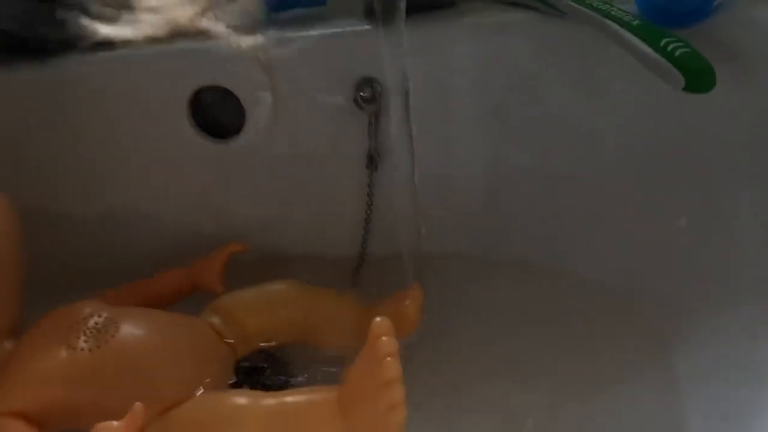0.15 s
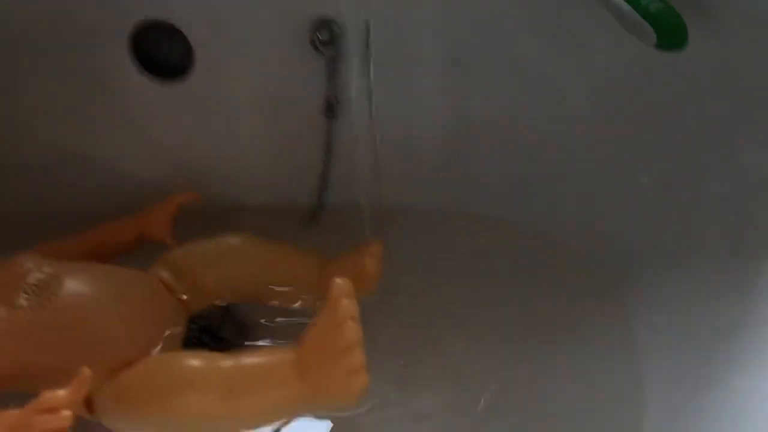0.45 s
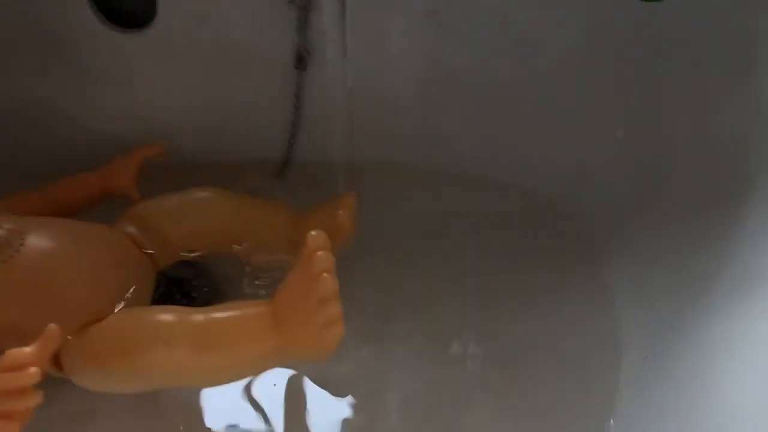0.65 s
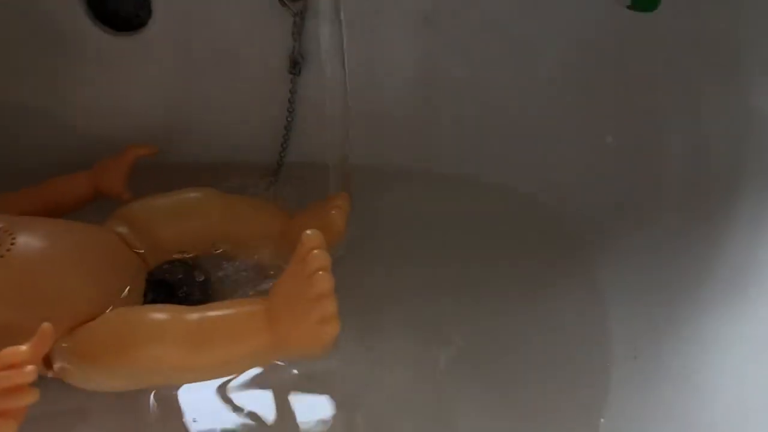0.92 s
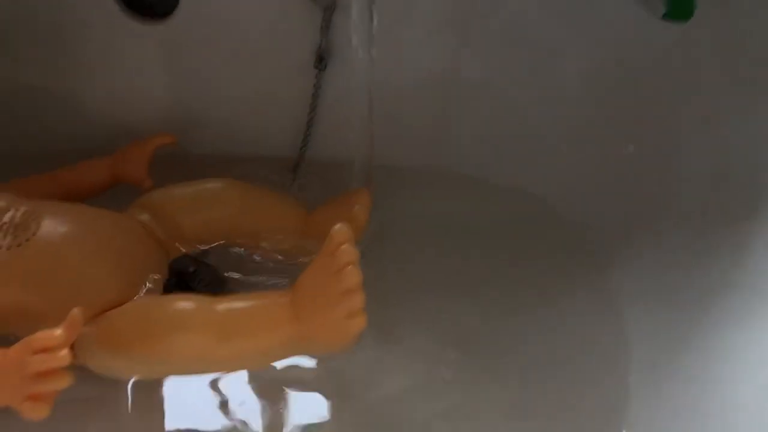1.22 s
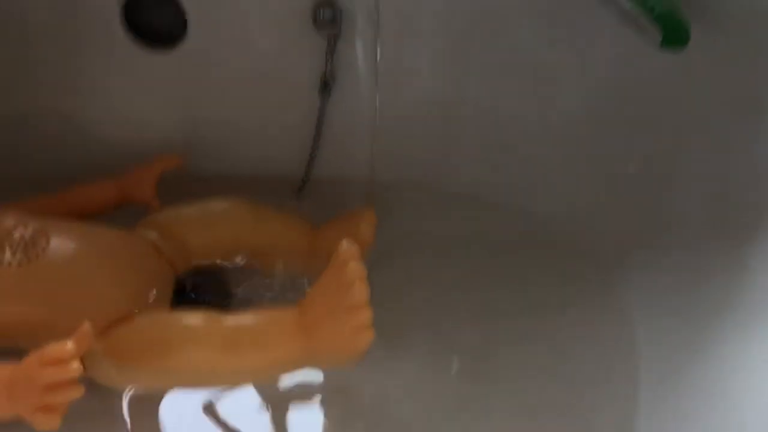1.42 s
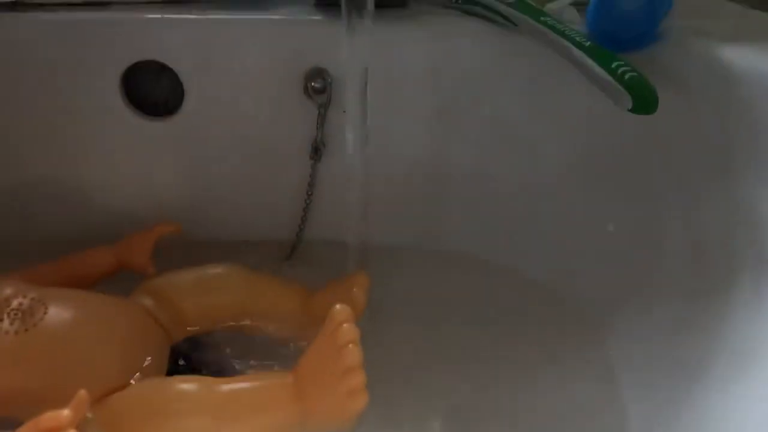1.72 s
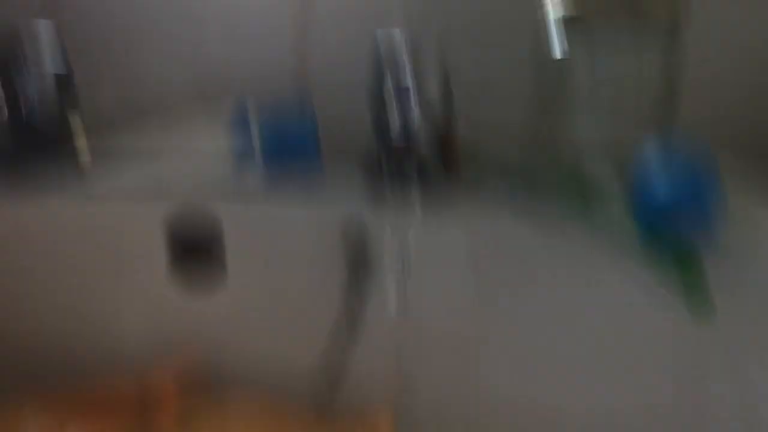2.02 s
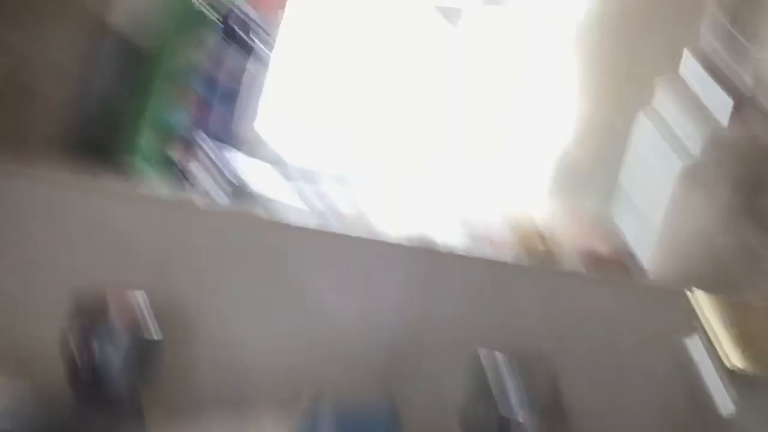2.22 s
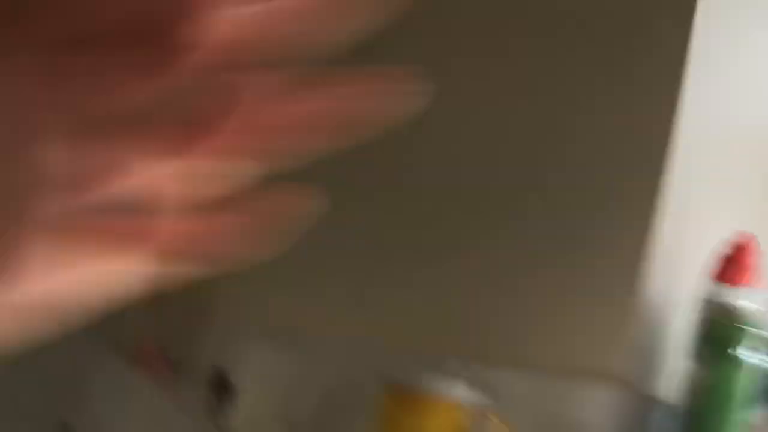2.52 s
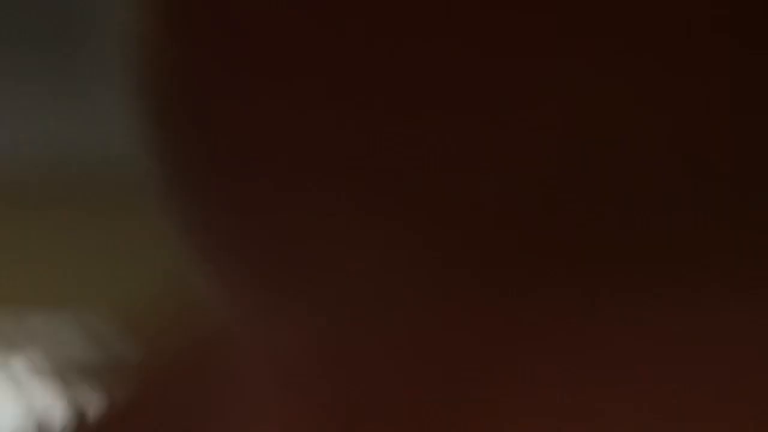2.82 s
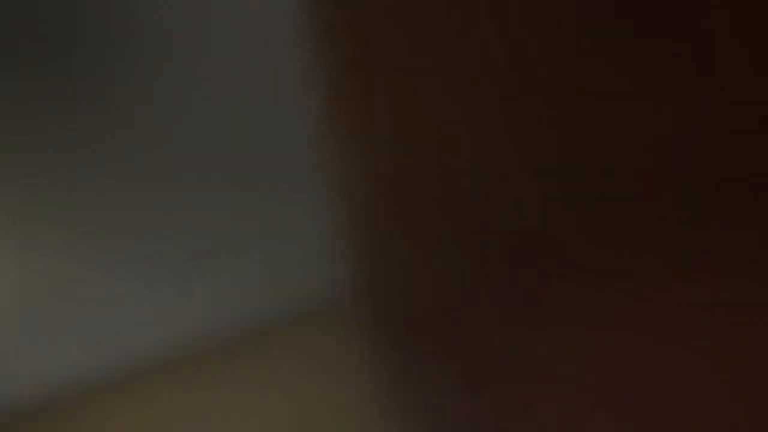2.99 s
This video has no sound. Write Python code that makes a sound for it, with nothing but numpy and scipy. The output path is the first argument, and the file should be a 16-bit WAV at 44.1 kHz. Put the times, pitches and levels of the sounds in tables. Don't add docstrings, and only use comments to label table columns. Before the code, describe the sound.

Thin tap water trickles and babbles into a bath while a hand-held phone is tapped and bumped.

```python
import sys
import numpy as np
from scipy import signal
from scipy.fft import rfft, irfft
from scipy.io import wavfile
from scipy.ndimage import uniform_filter1d

SR = 44100
rng = np.random.default_rng(int(sys.argv[2]) if len(sys.argv) > 2 else 0)


def attenuation_scalar(level_db):
    decades = np.asarray(level_db, float) / 20
    return 10 ** decades


def transcribe(signal):
    frames = np.atleast_2d(signal).T
    limited = np.clip(frames, -1, 1)
    pcm = np.round(limited * 32767).astype(np.int16)
    wavfile.write(sys.argv[1], SR, pcm)


N = 138915

# t/s, wash level/dB, spray level/dB
STREAM = [
    (0.0, -52, -53),
    (.6, -53, -55.5),
    (1.05, -50.5, -56),
    (1.25, -51, -45.5),
    (1.45, -55, -56.5),
    (1.65, -52, -56.5),
    (2.1, -52.5, -54),
    (2.4, -50.5, -59),
    (3.15, -58.5, -59),
]
RISE = 0.013


def evened(x):
    return x / np.sqrt(np.mean(x ** 2) + 1e-20)


def read(points, hz):
    f, value = np.transpose(points)
    return np.interp(np.log(hz + 1), np.log(f + 1), value)


def along(table, axis):
    rows = np.array(table)
    return np.interp(np.arange(N) / SR, rows[:, 0], rows[:, axis])


def add(mix, s, sound):
    part = mix[max(round(s * SR), 0):][:len(sound)]
    part += sound[:len(part)]


def hiss(colour, patchy_db, flicker_db, size, count=9):
    hop = size // 4
    frames, hz = N // hop + 5, np.fft.rfftfreq(size, 1 / SR)
    a, b, patches = rng.standard_normal((frames, len(hz), 3)).T
    patches = uniform_filter1d(patches, size=3, axis=0)
    patches = evened(uniform_filter1d(patches, size=count, axis=1))
    flicker = evened(uniform_filter1d(rng.standard_normal(frames), size=4))
    level_db = read(colour, hz)[:, None] + patchy_db * patches + flicker_db * flicker
    z = (a + 1j * b) * attenuation_scalar(level_db)
    return evened(signal.istft(z, nperseg=size, noverlap=size - hop)[1][:N])


def band(hz, width):
    f = np.fft.rfftfreq(N, 1 / SR)
    gain = np.exp(-((f - hz) / width) ** 2)
    return evened(irfft(rfft(rng.standard_normal(N)) * gain, N))


def bubble(hz, cycles, rise):
    u = np.arange(0, 2, hz / SR / cycles)
    swell = (u / 0.27 * np.exp(1 - u / 0.31)) ** 2
    return np.sin(2 * np.pi * cycles * u * (1 + rise * u)) * swell


def random_clicks(per_s, spread_db, limit):
    return attenuation_scalar(spread_db * np.minimum(rng.exponential(1, N), limit)) * (rng.random(N) < per_s / SR)


def wash():
    # f/Hz, density/dB
    wash_colour = [(88, -64), (150, 3), (578, -3.5), (854, -8.5), (998, -5), (1720, -5.5), (2810, -9),
                   (5680, -11), (10000, -25.5), (16000, -21)]
    return attenuation_scalar(along(STREAM, axis=1) - 2.0) * hiss(wash_colour, patchy_db=4.0, flicker_db=3.35, size=1024, count=14)


def spray():
    # f/Hz, density/dB
    spray_colour = [(530, -40), (900, -10), (1020, -88), (1660, -28.5), (2600, 18), (4980, 17.5),
                    (6330, 14.5), (16000, -9)]
    size = random_clicks(per_s=900, spread_db=11, limit=2.6)
    kind, out = rng.integers(0, 30, N), np.zeros(N)
    for k, hz in enumerate(np.geomspace(1000, 15500, 30)):
        grain = bubble(hz, 9.3 + 1.4 * rng.random(), 0.032) * attenuation_scalar(read(spray_colour, hz)) * hz ** 1.46
        out += signal.oaconvolve(size * (kind == k), grain)[:N]
    return evened(out)


def ticks():
    ticks_per_s, ticks_db = 300, -6
    out = np.zeros(N)
    for hz in np.geomspace(6000, 15500, 8):
        clicks = random_clicks(ticks_per_s / 8, spread_db=4, limit=2.5)
        out += signal.oaconvolve(clicks, bubble(hz, 5, .05))[:N]
    return attenuation_scalar(ticks_db) * evened(out)


def gurgle():
    centre_hz, width_hz, level_db, end_s = 4100, 1900, -57.5, .3
    t, out = np.arange(N) / SR, np.zeros(N)
    for place in (-.25, -.15, -.05, .1, .35, .65):
        clicks = random_clicks(per_s=40, spread_db=6.1, limit=2)
        out += signal.oaconvolve(clicks, bubble(centre_hz + width_hz * place, 10, .04))[:N]
    return attenuation_scalar(level_db) * evened(out) * np.clip((end_s - t) / 0.013, 0, 1)


def sway():
    sway_hz, sway_db = 63.9, -1.5
    turns = np.cumsum(sway_hz * (1 + 0.1011 * band(0, 7.49))) / SR
    return attenuation_scalar(sway_db + 1.0 * band(0, 24)) * np.sin(2 * np.pi * turns)


def tremor():
    # t/s, level/dB
    tremor_level = [(0, -49.5), (.2, -54), (.36, -43.5), (.5, -64), (.95, -56.5), (1.25, -47), (1.5, -57.5),
                    (1.78, -46), (1.85, -56.5), (1.92, -35), (1.96, -56), (2.02, -39.5), (2.24, -55),
                    (2.33, -47), (2.55, -48), (2.62, -48), (2.8, -46.5), (3.15, -52)]
    # f/Hz, density/dB
    rumble_colour = [(18, -45), (30, -32), (46, -1), (65, 8), (97, 0), (204, -13), (238, -23), (400, -39.5),
                     (520, -57), (880, -120)]
    rumble = hiss(rumble_colour, patchy_db=3.5, flicker_db=0.5, size=2048) + sway()
    mic_low_cut = signal.butter(5, 55, "high", fs=SR, output="sos")
    return signal.sosfilt(mic_low_cut, attenuation_scalar(along(tremor_level, axis=1) + 0.5) * rumble)


def whistle():
    return attenuation_scalar(-81) * band(10550, 80)


def knock(peak_db, hard, shallow, late, echo_db):
    late_s, late_power = 0.01214, 1.526
    knee_hz, case_low_hz, slope_db = 157.4, 36.8, -3
    body_hz, body_width_hz, body_db = 83.5, 59, 8.5
    shell_hz, shell_width_hz, shell_db = 151, 47, -5
    hollow_hz, hollow_width_hz, hollow = 774, 134, 0.23
    echo_s = 0.00396
    hz = np.fft.rfftfreq(8192, 1 / SR) + 1
    delay_s = 0.001293 + late * late_s * (100 / np.maximum(hz, 55)) ** late_power
    low = (hz / (case_low_hz * 2 ** shallow)) ** 7
    gain = low / (1 + low) * attenuation_scalar(slope_db * np.log2(1 + hz / knee_hz))
    gain = gain * np.exp(-(hz / (100 * 2 ** hard)) ** 1.326)
    body = 1 + attenuation_scalar(body_db) / (1 + 2j * (hz - body_hz) / body_width_hz)
    body = body + attenuation_scalar(shell_db) / (1 + 2j * (hz - shell_hz) / shell_width_hz)
    body = body * (1 - hollow / (1 + 2j * (hz - hollow_hz) / hollow_width_hz))
    when, sign = rng.random((3, 1)), rng.choice([-1, 1], (3, 1))
    echoes = 1 + attenuation_scalar(echo_db) * (sign * np.exp(-2j * np.pi * hz * echo_s * when)).sum(0)
    spread = np.exp(-2j * np.pi * np.cumsum(delay_s) * SR / 8192)
    x = irfft(gain * body * echoes * spread)[:6000]
    return attenuation_scalar(peak_db) * x / abs(x).max()


def skin():
    # f/Hz, density/dB
    skin_colour = [(88, -70), (150, 0.5), (324, -31), (355, -11), (1150, -17.5), (1310, -20), (1780, -18.5),
                   (2140, -15.5), (12000, -34.5), (15600, -86), (22000, -120)]
    return hiss(skin_colour, patchy_db=1.5, flicker_db=1.5, size=256)


def bumps(friction):
    # t/s, peak level/dB, hardness/octaves, shallowness/octaves
    pushes = [(0.009, -40.5, 3.3, 0.59), (1.924, -50, 3.2, 0.41), (2.088, -35, 1.7, 1.3),
              (2.1, -22, 2, 3.1), (2.104, -20, 2.1, 2.5), (2.111, -14, 2.54, 1.65), (2.13, -28, 2.5, 3.1),
              (2.134, -34, 2.2, 3.3), (2.14, -23.5, 3.1, 0.68), (2.517, -40.5, 2.3, 0.24),
              (2.533, -36, 1.1, 0.21), (2.659, -34, 3.2, 3.5), (2.821, -21.5, 1, 1.4),
              (2.828, -24, 1.6, 1.4), (2.834, -13.5, 2.45, 2.54), (2.838, -2.5, 1.44, 0.6),
              (2.844, -12.5, 2.7, 2), (2.848, -15.5, 2.5, 3.3), (2.872, -28, 2, 0.4),
              (2.888, -40, 2.6, 0.58), (2.911, -44, 2.1, 1.9), (2.938, -26, 1.7, 1.1),
              (2.957, -23.5, 2.4, 1.3), (2.969, -30, 1.4, 0.71), (2.984, -28.5, 2.4, 0.6),
              (3.002, -28, 1.7, 0.92)]
    softest_skin, crunch_db, crunch_s = 2.8, -32, 0.007
    u = np.arange(2000) / SR / crunch_s
    crunch = 4 * u * np.exp(1 - 4 * u)
    out = np.zeros(N)
    for s, peak_db, hard, shallow in pushes:
        add(out, s, knock(peak_db, min(hard, softest_skin), shallow, late=0.533, echo_db=-12))
        part = friction[round(s * SR):][:2000]
        add(out, s, attenuation_scalar(peak_db + crunch_db) * part * crunch[:len(part)])
    return out


def babble():
    # t/s, peak level/dB, f/Hz
    pocket = [(0.0144, -56, 4800), (0.0405, -48, 4300), (0.0525, -42.5, 3950), (0.0706, -40.5, 3800),
              (0.0952, -47, 3960), (0.1008, -39.5, 3820), (0.1244, -40, 5100), (0.1636, -40, 3840),
              (0.196, -43, 4090), (0.2217, -40.5, 3770), (0.2661, -30, 4070), (0.325, -39.5, 4230)]
    out = np.zeros(N)
    for s, db, hz in pocket:
        add(out, s, attenuation_scalar(db - 2.5) * bubble(hz, 11, RISE))
    return out


def bursts():
    # t/s, peak level/dB, f/Hz
    drops = [(0.0493, -35.5, 10900), (0.1173, -40, 7950), (0.154, -44.5, 8700), (0.2493, -50, 12200),
             (0.4354, -53, 10500), (0.483, -42, 12500), (0.5045, -49, 8820), (0.5282, -45, 10500),
             (0.611, -50, 9330), (0.627, -42, 9400), (0.6963, -46, 8070), (0.708, -41, 9500),
             (0.7377, -44, 10500), (0.7552, -41, 13400), (0.8021, -37, 9900), (1.0896, -35, 10800),
             (1.1623, -44, 13500), (1.2015, -40, 10000), (1.2555, -53, 13200), (1.2715, -51, 8000),
             (1.3229, -46, 8300), (1.3423, -31.5, 10500),
             (1.4481, -43.5, 8100), (1.5599, -40, 8800), (1.5848, -39, 14000), (1.6407, -45, 7940),
                  (1.6631, -45, 8700), (1.6701, -35.5, 7770), (1.7245, -40.5, 8850), (1.7435, -42, 14200),
                  (1.8018, -47, 9590), (1.8278, -41, 9570), (1.8402, -33.5, 9000), (1.8996, -49, 15200),
                  (1.9131, -39, 14200), (1.9255, -41.5, 9200), (2.0273, -38.5, 11500), (2.2847, -47, 8700),
                  (2.3167, -50, 9070), (2.3291, -42, 9070), (2.3386, -38, 8200), (2.3566, -32.5, 7800),
                  (2.4124, -45, 12500), (2.4299, -40.5, 7650), (2.4593, -41, 14600), (2.5047, -45, 11700),
                  (2.5531, -51, 8900), (2.5531, -41, 7940), (2.587, -46.5, 10100), (2.607, -59, 8000),
                  (2.6629, -62, 8140), (2.6768, -43, 14200), (2.83, -58, 8510), (2.9353, -48.5, 9400),
                  (2.9617, -42, 14800), (2.9772, -39, 14600), (3.046, -36, 14200), (3.1243, -42, 14900)]
    out = np.zeros(N)
    for s, db, hz in drops:
        for k, (lag, shift) in enumerate(rng.random((3, 2))):
            piece_hz = min(hz * (1 + .35 * k * (shift - .4)), 15700)
            piece = bubble(piece_hz, 8, RISE)
            add(out, s + .0006 + .002 * k * lag, attenuation_scalar(db - 4 - 3 * k) * piece)
    return out


def clear_bubbles():
    # t/s, peak level/dB, f/Hz
    bubbles = [(0.119, -37, 7000), (0.1065, -51, 7000), (0.448, -44.5, 4330), (0.4831, -48.5, 6240),
               (0.5282, -45, 6700), (0.547, -36.5, 5740), (0.757, -45, 4270), (0.8802, -40, 6330),
               (1.072, -44.5, 4370), (1.271, -41.5, 7000), (1.3265, -40, 7000), (1.3715, -42.5, 4070),
               (1.463, -45, 6140), (1.602, -44, 2570), (1.6401, -42.5, 6240), (1.672, -42, 6700),
                    (1.7394, -62, 3440), (1.7967, -56, 1750), (1.8412, -54.5, 1260), (1.9544, -46, 6260),
                    (2.0074, -44, 3940), (2.201, -46, 1040), (2.324, -42, 4090), (2.357, -36, 6900),
                    (2.358, -43.5, 1350), (2.555, -53.5, 2030), (2.6266, -48.5, 2700), (2.6807, -54, 2100),
                    (2.8322, -38.5, 1450), (3.046, -46, 1780)]
    out = np.zeros(N)
    for s, db, hz in bubbles:
        add(out, s, attenuation_scalar(db) * bubble(hz, 7.35 * (1.33 + hz / 9000), RISE))
    return out


def room(near):
    t60_s, room_db = 0.03, -12.5
    t = np.arange(6000) / SR
    tail = rng.standard_normal(6000) * attenuation_scalar(-60 * t / t60_s) * (t > .002)
    return attenuation_scalar(room_db) * signal.oaconvolve(near, tail / np.linalg.norm(tail))[:N]


def rubs(friction):
    # start t/s, length/s, level/dB, rise share/1
    strokes = [
        (0.221, .17, -47.5, 0.93),
        (1.18, 0.23, -53.5, 0.27),
        (2.054, 0.16, -49, 0.45),
        (2.658, 0.17, -48, 0.068),
        (2.773, 0.12, -53, 1),
        (2.926, 0.11, -48.5, 0.044),
        (3.032, 0.19, -53.5, 0.068),
    ]
    out = np.zeros(N)
    for s, length_s, db, share in strokes:
        u, share = np.arange(0, 1, 1 / (length_s * SR)), np.clip(share, .02, .98)
        shape = np.minimum(u / share, (1 - u) / (1 - share)) ** 0.39
        part = friction[round(s * SR):][:len(u)]
        add(out, s, attenuation_scalar(db) * shape[:len(part)] * part)
    return out


def nail(peak_db):
    # f/Hz, level/dB, T60/s
    case_modes = [(1326, 4, 0.013), (1955, 5, 0.012), (2480, -7.5, 0.014), (3185, 2, 0.0091),
                  (4850, 9, 0.0033), (7330, -6.5, 0.0044), (10300, -11, 0.0026), (14200, -28, 0.0033)]
    t, x = np.arange(900) / SR, np.zeros(900)
    for k, (hz, db, t60_s) in enumerate(case_modes):
        x += (-1) ** k * attenuation_scalar(db - 60 * t / t60_s) * np.sin(2 * np.pi * hz * t)
    x = x * np.minimum(t / 0.00032, 1)
    return attenuation_scalar(peak_db) * x / abs(x).max()


def taps():
    # t/s, peak level/dB, hardness/octaves, shallowness/octaves, nail level/dB
    finger_taps = [
        (0.389, -19.5, 2.56, 0.99, -32),
        (0.697, -18.5, 3.67, 1.08, -21.5),
        (1.0044, -24.5, 1.2, 0.48, -55),
        (1.3422, -6, 2.83, 1.73, -4.5),
    ]
    late_per_db = 0.0669
    out = np.zeros(N)
    for s, peak_db, hard, shallow, nail_db in finger_taps:
        late = 0.916 + late_per_db * (peak_db + 20)
        add(out, s, knock(peak_db, hard, shallow, late, echo_db=-19))
        add(out, s, nail(nail_db))
    return out


def squeaks():
    # start t/s, length/s, level/dB, f/Hz
    slides = [
        (2.66, 0.071, -57, 2045),
        (2.867, .04, -49, 800),
        (3.034, 0.16, -58, 1380),
        (3.044, 0.1, -58.5, 2000),
    ]
    out = np.zeros(N)
    for s, length_s, db, hz in slides:
        part = band(hz, 110)[:round(length_s * SR)]
        add(out, s, attenuation_scalar(db) * part * np.hanning(len(part)) ** 0.15)
    return out


def scrapes():
    # start t/s, length/s, level/dB
    cloth_moves = [
        (2.92, .12, -68),
        (3.03, .16, -67),
    ]
    cloth = band(13300, 1100) * attenuation_scalar(1.6 * band(0, 60))
    out = np.zeros(N)
    for s, length_s, db in cloth_moves:
        part = cloth[round(s * SR):][:round(length_s * SR)]
        add(out, s, attenuation_scalar(db) * part * np.hanning(len(part)) ** .5)
    return out


def water():
    near = attenuation_scalar(along(STREAM, axis=2) - 8.5) * (spray() + ticks())
    near = near + gurgle() + babble() + bursts() + clear_bubbles()
    return near + room(near) + wash()


def hand():
    friction = skin()
    return tremor() + bumps(friction) + rubs(friction) + taps() + squeaks() + scrapes()


def scene():
    dry = water() + whistle() + hand()
    edge = signal.firwin(301, 15950, window=("kaiser", 8), fs=SR)
    return signal.oaconvolve(dry, edge, "same")[None]


def band_limit(x):
    return signal.sosfilt(signal.butter(12, 16640, fs=SR, output="sos"), x)


def record(dry):
    return band_limit(dry)


dry = scene()
out = record(dry)
transcribe(out)
```